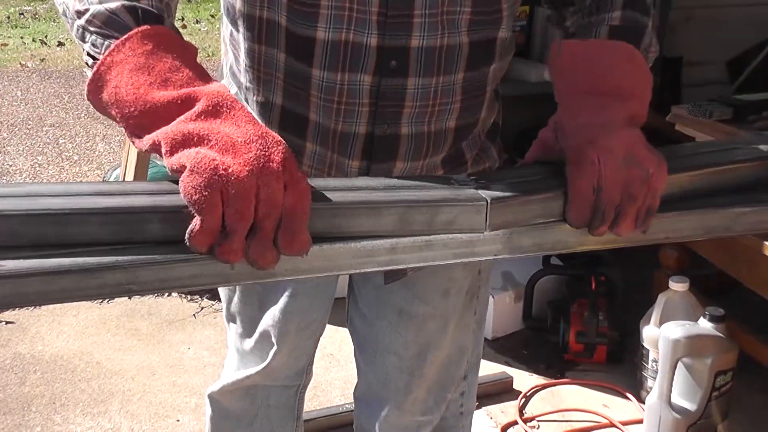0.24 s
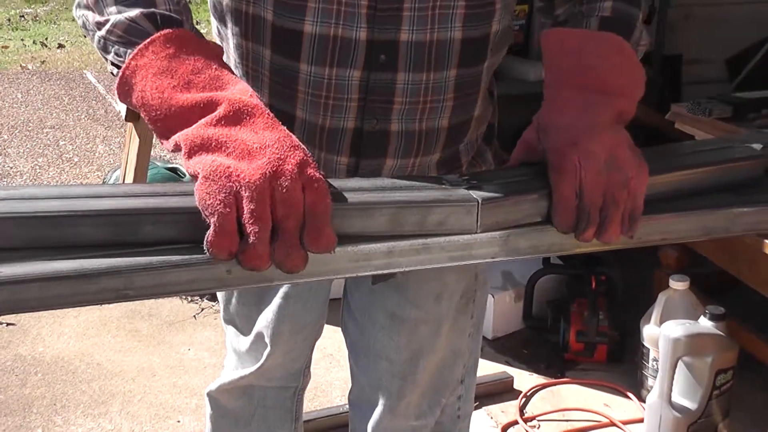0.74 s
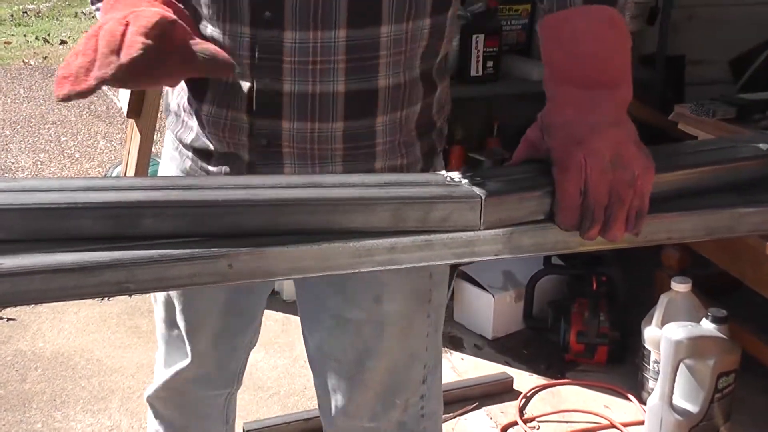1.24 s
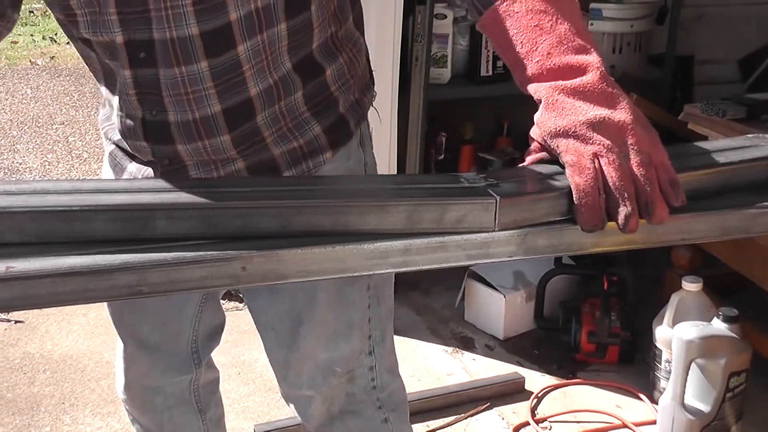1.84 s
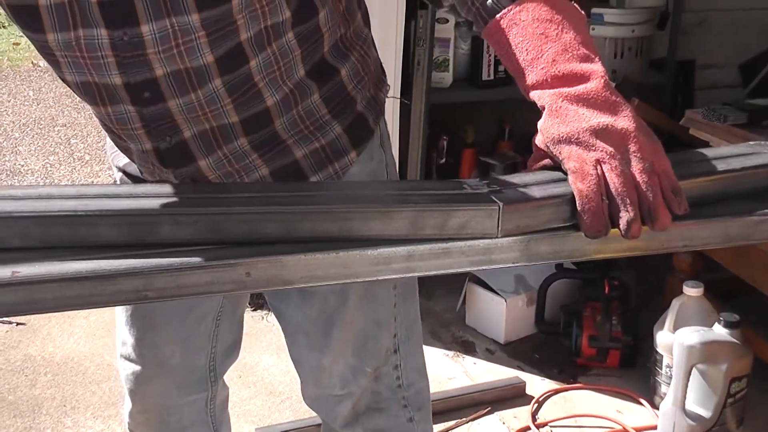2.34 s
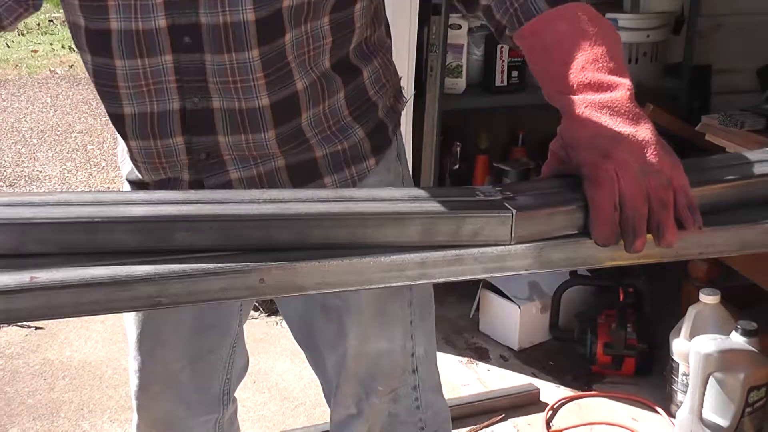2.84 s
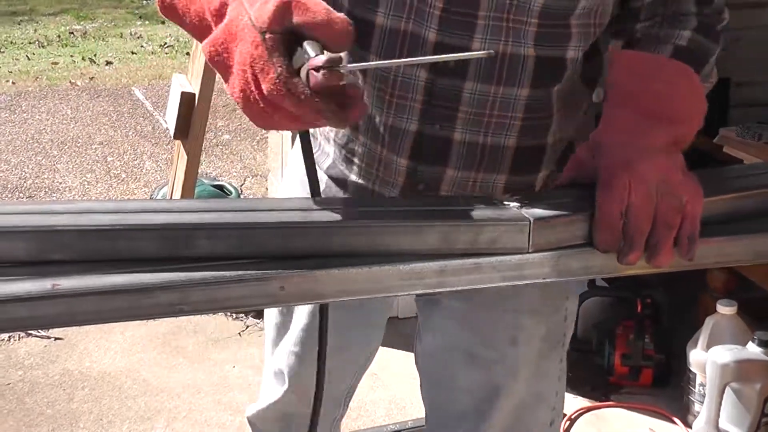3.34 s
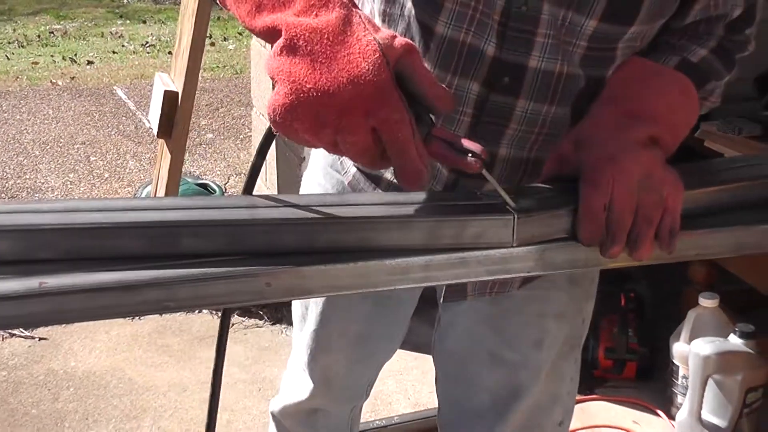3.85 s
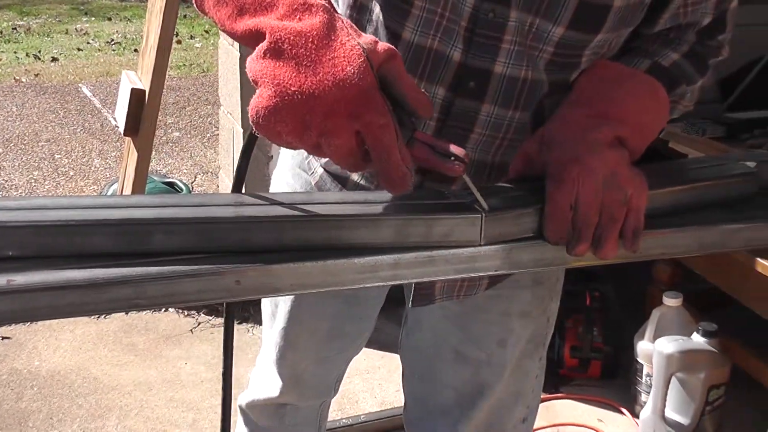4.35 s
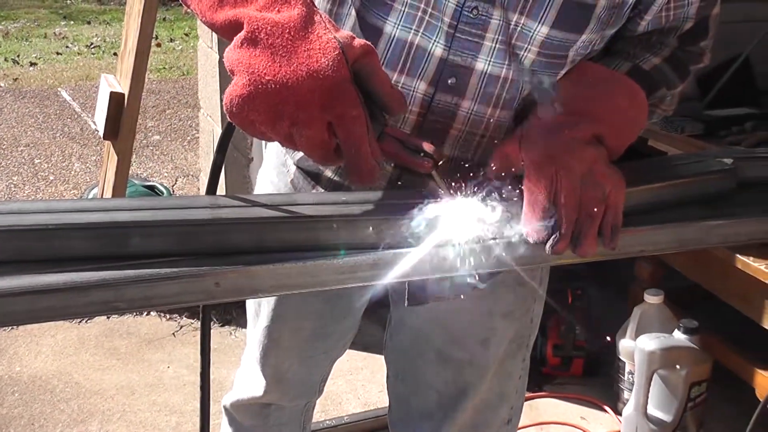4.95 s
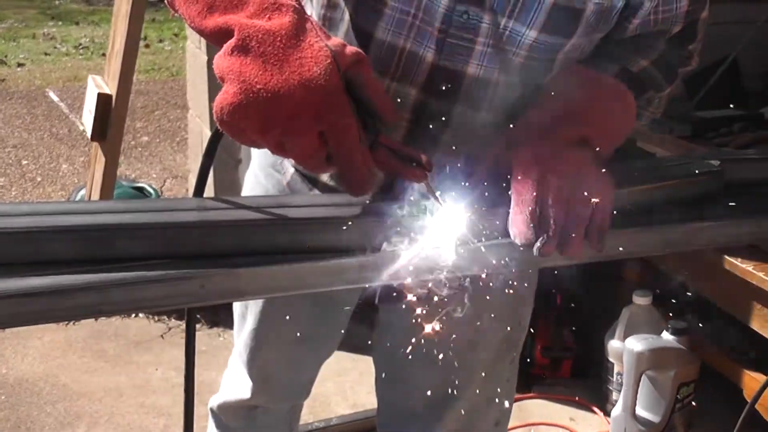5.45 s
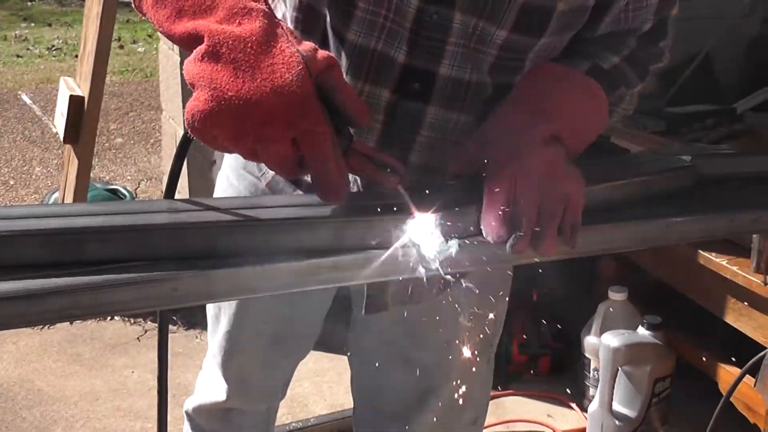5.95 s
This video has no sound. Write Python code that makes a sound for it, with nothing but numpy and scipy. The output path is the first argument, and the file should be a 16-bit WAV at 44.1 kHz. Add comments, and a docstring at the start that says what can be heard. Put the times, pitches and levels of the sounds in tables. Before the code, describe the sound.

At an open workshop door, steel tubes scrape and ring briefly with one solid knock, leaving a thin metallic singing. A distant aircraft-like roar swells and gusts thump the microphone. Light ticks and a rod holder's clatter follow, then a rod grazes the steel. After a windy pause, an electric arc snaps on, crackling and spitting over a low mains hum until the end. Close stereo microphone, dry, with steady hiss.

```python
"""At an open workshop door steel tubes are slid and knocked into line, then a stick-welding arc is struck.
Friction noise and short impacts excite damped modes of the steel, and two close sines sing at the start.
The arc is noise pulsed twice per mains cycle, with droplet bursts and a hum. Behind it a distant
aircraft-like roar swells and fades as noise lifted at the shed's resonances, gusts buffet two microphone
ports as low noise and damped pushes, and a steady hiss and a faint whine remain."""
import sys
import numpy as np
from scipy import signal
from scipy.fft import rfft, irfft, next_fast_len
from scipy.io import wavfile
from scipy.ndimage import uniform_filter1d, map_coordinates

SR = 44100
rng = np.random.default_rng(int(sys.argv[2]) if len(sys.argv) > 2 else 0)


def digitize_waveform(pressure):
    """Quantize a signal to 16-bit integers and store it at the path in sys.argv[1].

    Rows of a 2-D input are taken as channels; values are limited to [-1, 1].
    """
    field = np.atleast_2d(pressure).T
    bounded = np.clip(field, -1, 1)
    quanta = np.round(bounded * 32767).astype(np.int16)
    wavfile.write(sys.argv[1], SR, quanta)


N = 272974


def amp(db):
    """Logarithmic level: decibels to an amplitude factor."""
    return 10 ** (np.asarray(db) / 20)


def unit(x):
    """Normalisation by effective value: scaled to rms 1."""
    return x / np.sqrt(np.mean(x ** 2) + 1e-20)


def along(points, hz):
    """Spectral envelope: (frequency [Hz], value) points joined on a logarithmic frequency axis."""
    f, v = np.transpose(points)
    return np.interp(np.log(hz + 1), np.log(f + 1), v)


def curves(rows):
    """Temporal envelopes: one curve for each column after the time, very low outside the table."""
    s, *columns = np.transpose(rows)
    t = np.arange(N) / SR
    return [np.interp(t, s, column, left=-120, right=-120) for column in columns]


def wobble(rate):
    """Slow random modulation: a smooth curve through `rate` random knots a second."""
    knots = rng.standard_normal(int(N * rate / SR) + 4)
    return map_coordinates(knots, [np.arange(N) * rate / SR])


def filtered(x, response):
    """Linear filtering: the spectrum of x is multiplied by a frequency response."""
    m = next_fast_len(x.shape[-1] + 8192)
    spectrum = rfft(x, m) * response(np.fft.rfftfreq(m, 1 / SR))
    return irfft(spectrum, m)[..., :x.shape[-1]]


def pair(colour, alike, patchy_db=0, size=2048):
    """Partial coherence: stereo noise of rms 1, coloured, with a left-right likeness per frequency."""
    z = signal.stft(rng.standard_normal((2, N)), nperseg=size)[2]
    # random gains, smoothed over frequency and time, make the noise patchy
    field = rng.standard_normal(z.shape[1:])
    field = uniform_filter1d(uniform_filter1d(field, size=3, axis=0), size=4, axis=1)
    noise = signal.istft(z * amp(patchy_db * unit(field)), nperseg=size)[1][:, :N]
    turn = lambda hz: np.arccos(np.clip(alike(hz), -1, 1)) / 2
    mid, side = filtered(noise, lambda hz: colour(hz) * [np.cos(turn(hz)), np.sin(turn(hz))])
    return unit(np.array([mid + side, mid - side]))


# Spectra of the low and high rubbing noise: (frequency [Hz], relative density [dB])
GRIT_LOW_SPECTRUM = [(1000, -40), (1700, -8), (2100, -3), (2700, -7), (3500, 0), (4500, -6), (5200, -30)]
GRIT_HIGH_SPECTRUM = [(4200, -13), (5200, -4.5), (5700, 1.5), (7000, -3.5), (9000, -3), (11000, -3),
                      (13000, -7), (14800, -11), (15300, -61)]
# Damped modes of the long tube: (frequency [Hz], relative strength [dB], 60 dB decay [s])
TUBE_MODES = [(1140, 4, .045), (1780, 5, .04), (1912, -2, .16), (2048, 8, .045), (2240, -13, .18),
              (2593, -7, .16), (2977, -14, .18), (3270, 5, .035), (4760, -11, .12), (5137, 0, .1),
              (5240, 10, .03), (5351, -1, .14), (5720, -6, .07), (5874, -6, .13), (6075, -6, .12),
              (6300, -5, .12), (6896, -9, .1), (7383, -7, .15), (8200, -7, .15), (8872, -6, .13),
              (9103, -3, .18), (9830, -8, .15), (10730, -7, .15), (11009, -2, .22), (11360, -8, .2),
              (12720, -10, .18), (13470, -10, .16)]
# Damped modes of the rod holder and bench: (frequency [Hz], relative strength [dB], 60 dB decay [s])
HOLDER_MODES = [(906, 17.5, 0.064), (1090, 17, 0.04), (1275, 11, .03), (2040, 3, 0.058), (2250, 3.5, 0.025),
                (2450, 5, 0.058), (2670, 2, 0.028), (2900, 3, 0.034), (3560, -11, 0.04), (3900, -1, .04),
                (4280, -1.5, 0.052), (4680, 3, 0.04), (5830, -5, .03), (6100, 3, 0.035), (6400, 3, 0.019),
                (8440, 9, 0.022), (9660, 1, 0.031)]
# While the holder is picked up: (start [s], end [s])
HOLDER_TIMES = (2.05, 2.55)
# Damped modes of the rod in its jaws: (frequency [Hz], relative strength [dB], 60 dB decay [s])
ROD_MODES = [(1600, 9, 0.057), (2070, 10, 0.057), (3580, 0, 0.084), (4630, 2, .05), (5380, 14.5, 0.027),
             (7300, -2, .04), (9190, -5, .04), (11000, 9, .04)]
# While the rod is swung over and grazes the steel: (start [s], end [s])
ROD_TIMES = (3.33, 3.6)


def steel():
    """Forced vibration: friction and impacts are heard directly and also drive the resonant modes."""
    high_gain, low_gain, ring_gain = rubbing()
    rub = amp(1.3 * wobble(700)) * pair(np.ones_like, np.ones_like, patchy_db=2.5, size=512)[0]
    low = unit(filtered(rub, lambda hz: amp(along(GRIT_LOW_SPECTRUM, hz))))
    high = unit(filtered(rub, lambda hz: amp(along(GRIT_HIGH_SPECTRUM, hz))))
    direct = np.pad(high_gain * high + low_gain * low, (0, SR))
    drive = direct * np.pad(ring_gain, (0, SR))
    add_knocks(direct, drive)

    # the modes that ring depend on what is being handled
    now = np.arange(N + SR) / SR
    holding = (now > HOLDER_TIMES[0]) & (now < HOLDER_TIMES[1])
    grazing = (now > ROD_TIMES[0]) & (now < ROD_TIMES[1])
    tube = filtered(drive * ~(holding | grazing), lambda hz: ringing(TUBE_MODES, hz))
    rod = filtered(drive * grazing, lambda hz: ringing(ROD_MODES, hz))
    holder = filtered(drive * holding, lambda hz: ringing(HOLDER_MODES, hz))
    return (direct + tube + holder + rod)[:N]


# Slides of the steel: (peak time [s], rise [s], fall [s], peak level [dB],
# low-grit level over high [dB], drive of the modes over the direct sound [dB])
SLIDES = [(0, .05, 0.063, -40.5, -10, 1.5), (.11, 0.082, 0.16, -41, -10.5, 0.5),
          (0.214, 0.043, 0.13, -30.5, -8, 1.5), (.47, .11, 0.14, -36.5, -10, 1.5),
          (.73, 0.064, 0.11, -54.5, -5, -3), (.85, 0.076, 0.06, -54.5, -5, -1),
          (1.15, 0.19, 0.17, -56.5, 6, -8), (1.5, .4, 0.46, -70, 2, -1), (2, .1, 0.073, -62, -2, 1),
          (2.21, 0.23, 0.081, -59, 1.5, 13), (2.31, 0.035, 0.099, -59, 0, 17),
          (2.38, 0.1, 0.17, -67, 13, 4), (2.84, 0.094, 0.035, -59, 1, -7),
          (3.08, 0.067, 0.078, -58, -5, -6), (3.17, 0.056, 0.057, -55, -1, 6),
          (3.29, 0.043, 0.056, -64, -1, 1), (3.39, 0.029, 0.11, -48.5, -7, 6.5),
          (3.46, 0.13, 0.093, -47.5, -4.5, -17)]
SLIDE_END_DROP_DB = 30  # fall from a slide's peak after one rise or fall time
JUDDER_DB, REST_DB = 1.5, -69  # stick-slip unevenness, faint rubbing between slides


def rubbing():
    """Stick-slip friction: juddering gains of high and low grit and of the ring swell with each slide."""
    t, judder = np.arange(N) / SR, amp(JUDDER_DB * wobble(70))
    high, low, ring = (np.full(N, amp(REST_DB)) for _ in range(3))
    for s, rise_s, fall_s, db, low_db, ring_db in SLIDES:
        distance = (t - s) / np.where(t < s, rise_s, fall_s)
        gain = amp(db - SLIDE_END_DROP_DB * distance ** 2)
        high = high + gain
        low = low + amp(low_db) * gain
        ring = ring + amp(ring_db) * gain
    return judder * high, judder * low, ring / high


# Single contacts: (time [s], relative level [dB], centre frequency [Hz], width [octaves],
# relative drive of the modes [dB], 60 dB decay of the noise puff [s])
CONTACTS = [(0.183, -41, 5400, 1, -1, .14), (.22, -13, 1990, 2.5, -1.5, 0.13),
            (1.059, -33, 5530, .5, -20, .04), (1.103, -30, 5770, 0.97, -17, .032),
            (1.113, -36, 6900, 1.3, -13, .05), (1.148, -28, 4000, 0.59, -17, 0.13),
            (1.166, -23.5, 4400, 1.3, -24, 0.02), (1.172, -16.5, 4180, 0.75, -31, 0.097),
            (1.289, -44.5, 5000, 1.2, -7, 0.19), (1.582, -40.5, 8000, 0.89, -5, 0.16),
            (2.018, -46, 6200, 0.46, -16, .05), (2.156, -22, 950, 1.47, -1.5, 0.04),
            (2.341, -16.5, 2900, 1.15, -1.5, 0.12), (2.452, -36, 2400, 0.58, -5, 0.23),
            (2.6, -43, 7000, .9, -12.5, .05), (2.684, -38.5, 6400, 0.61, -8, 0.056),
            (2.781, -37, 3000, 1.1, -20, 0.085), (2.792, -44, 6280, .4, -20, .03),
            (3.078, -42, 7300, .3, -10, .08), (3.28, -43, 6000, .5, -20, .04),
            (3.358, -50, 5800, 0.6, -4, 0.1), (3.411, -27.5, 2900, 0.87, -3, 0.2),
            (3.443, -38, 10000, .6, -20, .03), (3.517, -42, 6500, .3, -20, .03),
            (3.546, -39, 6600, .4, -20, .05), (3.887, -46, 7600, 0.87, -5, 0.27),
            (4.391, -40.5, 7450, 1.2, -4, .11), (4.687, -34, 4100, 0.9, -17, 0.26)]
UNEVEN_DB = 1  # random spectral unevenness of a contact


def add_knocks(direct, drive):
    """Impulsive excitation: each contact adds a push and decaying noise to the direct sound and drive."""
    t = np.arange(SR // 4) / SR
    for s, db, centre_hz, octaves, share_db, t60 in CONTACTS:
        bell = lambda hz: np.exp(-.5 * (np.log2((hz + 1) / centre_hz) / octaves) ** 2)
        edges = lambda hz: 1 / (1 + (700 / (hz + 1)) ** 4) / (1 + (hz / 12500) ** 8)
        knots = rng.standard_normal(60)  # one every 300 Hz
        uneven = lambda hz: amp(UNEVEN_DB * np.interp(hz / 300, np.arange(len(knots)), knots))
        decay = amp(-60 * t / 0.011) + amp(-1.0 - 60 * t / t60)
        puff = decay * rng.standard_normal(len(t))
        push = np.arange(len(t)) == 20  # a one-sample push sets the modes ringing
        contact = np.array([puff + 5.6 * push, 0.69 * puff + 14 * push])
        contact = amp(db - 2.5) * filtered(contact, lambda hz: bell(hz) * edges(hz) * uneven(hz))
        direct[round(s * SR):][:len(t)] += contact[0]
        drive[round(s * SR):][:len(t)] += amp(share_db + 12.5) * contact[1]


def ringing(modes, hz):
    """Modal superposition: a causal sum of damped resonances, each bandwidth set by its decay time."""
    response = 0
    for k, (centre_hz, db, t60) in enumerate(modes):
        width_hz = np.log(1000) / np.pi / t60
        mode = 1j * hz * 50 / (centre_hz * centre_hz - hz * hz + 1j * hz * width_hz)
        response = response + (-1) ** k * amp(db) * mode  # neighbours alternate in sign
    return response


# Singing of the long tube: (time [s], rms level of each line [dB], gap to the upper line [Hz])
SINGING = [(0, -54, 120), (.05, -56, 118), (.12, -54, 119), (.18, -62, 126), (.24, -57, 192),
           (.3, -50, 181), (.42, -60, 181), (.49, -55, 130), (.56, -71, 170), (.62, -67, 170),
           (.66, -80, 150)]
SING_HZ = 3432  # the lower line


def singing():
    """Superposition of close tones: two wavering lines of the long tube beat until they fade early on."""
    level_db, gap_hz = curves(SINGING)
    lines = 0
    for upper in range(2):
        phase = 2 * np.pi * np.cumsum(SING_HZ + upper * gap_hz) / SR + 0.4 * wobble(20)
        lines = lines + amp(level_db + 1.3 * wobble(22.0)) * np.sqrt(2) * np.sin(phase)
    return lines


# Course of the arc: (time [s], relative crackle level [dB], rms hum level [dB])
ARC_COURSE = [(4.741, -26, -40), (4.83, -24, -22.5), (5.15, -26.5, -29), (5.38, -24, -25.5),
              (5.43, -30, -37), (5.53, -26.5, -24), (5.76, -28, -31.5), (5.98, -28, -39),
              (6.06, -30, -25.5), (6.1, -28, -30), (6.14, -30, -29), (6.19, -31, -30)]
# Spectrum of the sizzle: (frequency [Hz], relative density [dB])
SIZZLE_SPECTRUM = [(900, -12.5), (1600, -9), (2500, -10), (3200, -5), (4000, -8), (4700, -10), (5500, -3.5),
                   (6800, -4.5), (7700, -6.5), (8900, -2), (10500, -6.5), (13000, -11), (15000, -19),
                   (16000, -20)]
# Left-right likeness of the sizzle's noise: (frequency [Hz], correlation [-1 to 1])
SIZZLE_LIKENESS = [(2000, 0.98), (4000, 1), (8500, 1), (11000, 1), (14000, 0.93)]
# Echo of each droplet burst off the concrete below: (delay [s], level [dB])
GROUND_ECHO = (.0043, -4)
PULSE_HZ = 120  # twice the mains frequency
TREBLE_DB_PER_S = 3  # the top of the sizzle grows as the arc settles


def arc():
    """Modulated discharge noise: the arc flares each mains half cycle, spits, bursts droplets and hums."""
    level_db, hum_db = curves(ARC_COURSE)
    cycles = (np.arange(N) / SR - .004) * PULSE_HZ  # flares peak at whole numbers
    strengths = amp(2.2 * rng.standard_normal(int(N / SR * PULSE_HZ) + 2))
    strength = strengths[np.round(cycles).astype(int)]
    flare = .45 + strength * np.cos(np.pi * cycles) ** 4

    # random clicks, likelier during a flare
    spit_now = rng.random(N) < 400 / SR * flare
    spit_size = amp(np.minimum(4 * rng.exponential(1, N), 14))
    spits = spit_now * spit_size * rng.choice([-1, 1], N)
    # the colour of the sizzle keeps shifting
    patches = pair(np.ones_like, lambda hz: along(SIZZLE_LIKENESS, hz), patchy_db=0.5, size=256)
    colour = lambda hz: amp(along(SIZZLE_SPECTRUM, hz))
    sizzle = unit(filtered(flare * patches + 2.5 * spits, colour))
    out = amp(level_db - 7.0 + 1.0 * wobble(30)) * sizzle

    bursts = droplets(colour)
    echo_s, echo_db = GROUND_ECHO
    out = out + bursts + amp(echo_db) * np.pad(bursts, (round(echo_s * SR), 0))[:N]
    grown = amp(TREBLE_DB_PER_S * (np.arange(N) / SR - ARC_COURSE[0][0]))
    out = out + (grown - 1) * filtered(out, lambda hz: 1 / (1 + (11000 / (hz + 1)) ** 8))
    return out + amp(hum_db) * np.sqrt(2) * np.cos(2 * np.pi * (cycles + 0.22))


# Droplets bursting: (time [s], relative level [dB], tilt [dB per octave], low thud level [dB])
DROPLETS = [(4.7404, -16.5, 3, -25), (4.744, -8, 9, -25), (4.752, -8, 13, -5), (4.7545, -10, 2, -27),
            (4.7606, -14, 12, -25), (4.7687, -15, 3, -25), (4.7873, -12, 4, -9), (4.8119, -23, -8, -10),
            (4.8611, -20, 0, -25), (4.879, -14, 14, -6), (4.8863, -15, 2, -5), (4.894, -15, 3, -25),
            (4.903, -15.5, -7, 4), (4.9284, -18, 3, -25), (4.9455, -12, 9, -18), (5.013, -16, 1, -25),
            (5.0287, -12, -2, -15), (5.0464, -20, -3, -25), (5.088, -15, 0, -25), (5.0946, -4.5, 5.5, -23),
            (5.1618, -17, 0, -25), (5.229, -14, -2, -25), (5.2449, -22, 6, -25), (5.2846, -19, 9, -25),
            (5.3193, -18, 17, -25), (5.33, -14, -1, -5), (5.3534, -13.5, 1.5, -25), (5.3787, -21, 0, 0),
            (5.454, -15, -3, -25), (5.494, -12, 6, -25), (5.5035, -15, 13, -25), (5.519, -12, -3, -25),
            (5.5274, -14, 16, -9), (5.5463, -12, 0, -25), (5.5683, -15, 7, 0), (5.5801, -7.5, 2.5, -18),
            (5.5928, -15, 1, -11), (5.6046, -13, 4, -13), (5.6273, -27, -6, -25), (5.6365, -17, 2, -25),
            (5.661, -14, 8, -5), (5.68, -7.5, 8, 3.5), (5.7256, -21, 5, -27), (5.787, -6, -0.5, -4),
            (5.7953, -13, 0, -25), (5.8457, -15, 0, -25), (5.9192, -15, 3, -3), (5.9269, -15, 7, -25),
            (5.932, -17, -6, 8.5), (5.9374, -14, 16, -25), (5.962, -18, 7, -25), (5.9859, -15, 8, -25),
            (6.0022, -16, 3, -25), (6.0135, -18, 3, -25), (6.0507, -17, 9, -23), (6.087, -17, 13, -25),
            (6.0974, -18, 9, -25), (6.103, -9.5, 6, -1), (6.154, -9.5, 4, -11), (6.1694, -12, 5, -27)]


def droplets(colour):
    """Impulsive radiation: a bursting droplet gives one push with decaying noise, as crack and thud."""
    t, bursts = np.arange(SR // 20) / SR, np.zeros(N)
    for s, db, tilt_db, low_db in DROPLETS:
        decay = amp(-60 * t / 0.00068) + amp(-16.5 - 60 * t / 0.02)
        snap = decay * rng.standard_normal(len(t))
        snap[40] += 1.6  # the droplet bursts in one push
        tilt = lambda hz: amp(tilt_db * np.log2(np.clip(hz, 2500, 13000) / 6500))
        crack = filtered(snap, lambda hz: 1j * colour(hz) * tilt(hz))
        thud = amp(low_db) * filtered(snap, lambda hz: 1 / (1 + (hz / 1400) ** 4))
        at = bursts[round(s * SR):][:len(t)]
        at += amp(db) * ((crack + thud) / np.abs(crack).max())[:len(at)]
    return bursts


# Strength of the walls' answer: (frequency [Hz], gain [dB])
WALL_ANSWER = [(100, -16), (2000, -9.5), (4500, -16), (8000, -32), (12500, -3.5)]


def room(x):
    """Reverberation: convolution with short decaying noise, different at each port, answers for the walls."""
    t = np.arange(SR // 4) / SR
    tail = amp(-60 * t / 0.029) * rng.standard_normal((2, len(t)))
    wet = signal.fftconvolve(x[None], tail / np.linalg.norm(tail[0]), axes=1)[:, :N]
    return filtered(wet, lambda hz: amp(along(WALL_ANSWER, hz)))


# Course of the roar: (time [s], relative level [dB], relative brightness [dB])
ROAR_COURSE = [(0, -24, -1), (.2, -22.5, -3), (.55, -32, 1), (.9, -27.5, 0.5), (1.28, -17, -5),
               (1.9, -19, -1), (2.45, -15.5, -6), (2.7, -19, -6), (3, -21, -1.5), (3.5, -21.5, -5.5),
               (3.96, -18.5, -9), (4.3, -23.5, -8.5), (4.65, -27.5, -3), (5.1, -25.5, -3),
               (5.46, -24.5, -32), (5.75, -37, 0.5), (5.9, -26, -9.5), (6.19, -41, -1)]
# Spectra of the roar's body and top: (frequency [Hz], relative density [dB])
ROAR_BODY_SPECTRUM = [(80, -72), (130, -3.5), (200, -11), (300, 0), (420, -2), (600, -26.5), (900, -120)]
ROAR_TOP_SPECTRUM = [(300, -88), (480, 0), (700, -1.5), (1000, -9), (1500, -20), (2200, -38.5),
                     (3500, -45.5), (8000, -91), (14000, -120)]
# Air resonances of the shed: (frequency [Hz], width [Hz], lift [dB])
SHED_RESONANCES = [(241, 11.6, 10.5), (285.8, 6.1, 7.5), (367.3, 20, 6.5), (484, 13, 5.5), (604, 16, 5),
                   (722, 13, 6), (889, 9.5, 5), (1047, 12, 4.5)]
# Phase lead of the left port over the right, in the roar's top: (frequency [Hz], lead [rad])
ROAR_PHASE = [(200, -0.32), (860, -0.72), (1640, -0.39), (3400, 0.04)]
TOP_SPARED = 0.13  # share of a lull that the upper roar escapes


def roar():
    """Cavity resonance: broad noise, stronger on the left, is lifted at the shed's air resonances."""
    level_db, bright_db = curves(ROAR_COURSE)
    lull_db = lulls_db()
    shed = lambda hz: amp(sum(db / (1 + ((hz - c) / w * 2) ** 2) for c, w, db in SHED_RESONANCES))
    body_colour = lambda hz: amp(along(ROAR_BODY_SPECTRUM, hz)) * shed(hz)
    top_colour = lambda hz: amp(along(ROAR_TOP_SPECTRUM, hz)) * shed(hz)
    body = pair(body_colour, lambda hz: 0.89 + 0 * hz, patchy_db=0.5)
    top = pair(top_colour, lambda hz: along([(600, 0.89), (1500, 0.62)], hz), patchy_db=2.0)
    top = filtered(top, lambda hz: np.exp(.5j * along(ROAR_PHASE, hz) * [[1], [-1]]))
    top = top * amp(bright_db - TOP_SPARED * lull_db + 1.0 + 0.06 * wobble(66))
    level = amp(level_db + lull_db - 2.5 + 1.23 * wobble(12))
    return level * (body + top) * amp([[.7], [-.7]])


# Dips shared by roar and wind: (time [s], depth in the roar's body [dB], hold [s], return [s])
LULL_TIMES = [(0.212, -13, 0.022, 0.15), (2.555, -5, 0.05, 0.23), (2.786, -1.5, 0.016, 0.051),
              (3.218, -7.5, 0.11, 0.032), (3.38, -2, 0.016, 0.035), (3.647, -9.5, 0.013, 0.12),
              (4.045, -13.5, 0.036, 0.041), (4.734, -8, 0.048, 0.13), (5.227, -5.5, 0.1, 0.051),
              (5.773, -11, 0.017, 0.034)]
LULL_FALL_S = 0.034


def lulls_db():
    """Common amplitude modulation: each dip falls quickly, holds and returns steadily in decibels."""
    t, total_db = np.arange(N) / SR, 0
    for s, db, hold_s, back_s in LULL_TIMES:
        corners = np.cumsum([0, LULL_FALL_S, abs(hold_s), abs(back_s)])
        total_db = total_db + db * np.interp(t - s, corners, [0, 1, 1, 0])
    return total_db


# Course of the wind: (time [s], relative buffet level [dB], relative flutter over buffet [dB])
WIND_COURSE = [(0, -26.5, -12), (.45, -28, -14), (.72, -34, 10), (.85, -20.5, -16), (1.05, -29, -8),
               (2.15, -32, -4), (2.38, -39, 12), (2.57, -23.5, -8), (2.76, -23.5, -11), (2.95, -25, -7),
               (3.12, -18.5, -2.5), (3.55, -20, 6.5), (4.05, -21, -0.5), (4.4, -31.5, 3.5),
               (4.55, -21, 2.5), (5, -21.5, 5.5), (5.53, -22, 7.5), (5.76, -27, -1.5), (5.87, -14, -3.5),
               (6.03, -29.5, 1.5), (6.19, -30.5, 1)]
# Spectra of the buffeting and the flutter: (frequency [Hz], relative density [dB])
RUMBLE_SPECTRUM = [(20, -15), (40, -13.5), (70, -7), (120, 1), (180, -2), (300, -10), (600, -47),
                   (1200, -69), (2400, -120)]
FLUTTER_SPECTRUM = [(40, -46), (80, -14), (200, -2.5), (350, -3), (600, -11), (1000, -18.5), (1600, -28),
                    (3000, -57), (6000, -120)]
# Gust blows: (time [s], relative level [dB], frequency [Hz], left over right [dB])
BLOWS = [(0.476, -17, 83, -8), (0.809, -7.5, 131, 1), (0.876, -8.5, 200, -5), (1.093, -6.5, 255, 1),
         (1.192, -4, 258, 2), (1.389, -5.5, 295, 2), (1.88, -5, 270, 3), (2.566, -10.5, 185, -14),
         (2.713, -8.5, 120, -7), (3.179, -8, 84.5, -1), (3.36, -7, 171, 5), (3.479, -14, 118, -6),
         (3.561, -6.5, 142, -1), (3.654, -4, 200, -9), (3.76, -7, 119, 3), (4.02, -11, 144, 8),
         (4.511, -8, 159, 7), (5.455, -15, 176, -23), (5.647, -8.5, 129, 6), (5.851, -16, 110, 0)]
WIND_FEELS = 0.7  # depth of a lull in the wind over its depth in the roar


def wind():
    """Turbulent pressure: lumpy buffeting, flutter that differs between ports, and single blows."""
    buffet_db, flutter_db = curves(WIND_COURSE)
    buffet_db = buffet_db + WIND_FEELS * lulls_db()
    rumble = pair(lambda hz: amp(along(RUMBLE_SPECTRUM, hz)), lambda hz: 0.72 + 0 * hz)
    rumble = unit(amp(1.54 * wobble(25)) * rumble)
    eddies = amp(1.46 * wobble(14) + 3.96 * np.array([wobble(40), wobble(40)]))
    flutter = pair(lambda hz: amp(along(FLUTTER_SPECTRUM, hz)), lambda hz: -.2 + 0 * hz)
    flutter = unit(eddies * flutter)
    out = amp(buffet_db - 1.0) * rumble + amp(buffet_db + flutter_db - 6.5) * flutter
    t = np.arange(SR // 10) / SR
    for s, db, hz, pan_db in BLOWS:
        # the membrane is pushed and swings back for a cycle or two
        blow = np.sin(2 * np.pi * hz * t) * t * hz * np.exp(-t * hz * 1.18) * np.e
        at = out[:, round(s * SR):][:, :len(t)]
        at += amp(db - 4.5) * amp([[pan_db / 2], [-pan_db / 2]]) * blow[:at.shape[1]]
    return out


# Spectrum of the steady hiss: (frequency [Hz], relative density [dB])
HISS_SPECTRUM = [(1500, 1.5), (2500, -5.5), (3500, -9.5), (5300, -11), (9000, -15), (13500, -14.5),
                 (14200, -19), (14500, -120)]
# Left-right likeness of the hiss: (frequency [Hz], correlation [-1 to 1])
HISS_LIKENESS = [(2000, 0.93), (4000, 1), (9000, 1), (12000, 0.77), (14000, 0.46)]
HISS_DB = -53  # rms


def steady_hiss():
    """Stationary noise: a constant coloured hiss, less alike left and right at the top."""
    return amp(HISS_DB) * pair(lambda hz: amp(along(HISS_SPECTRUM, hz)), lambda hz: along(HISS_LIKENESS, hz))


# Faint tone: (frequency [Hz], mean peak level [dB])
WHINE_TONE = (11520, -76)


def faint_whine():
    """Pure tone: a sine of fixed pitch whose level wavers slowly."""
    hz, db = WHINE_TONE
    return amp(db + 1.5 * wobble(8)) * np.sin(2 * np.pi * hz * np.arange(N) / SR)


def scene():
    """Superposition: near-central work and its wall reflections join roar, wind, hiss and whine."""
    work = steel() + singing() + arc()
    near = work * amp([[.2], [-.2]]) + room(work.mean(axis=0))
    return near + roar() + wind() + steady_hiss() + faint_whine()


TOP_HZ = 16000


def record(dry):
    """Band limitation: nothing at or above the top frequency is kept."""
    return filtered(dry, lambda hz: hz < TOP_HZ)


dry = scene()
out = record(dry)
digitize_waveform(out)
```